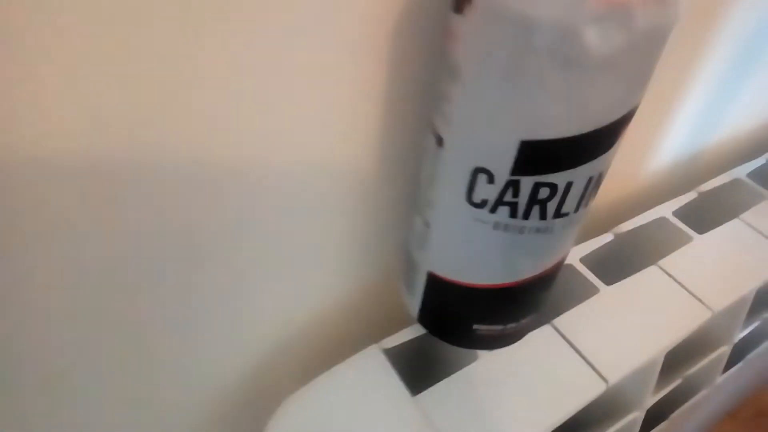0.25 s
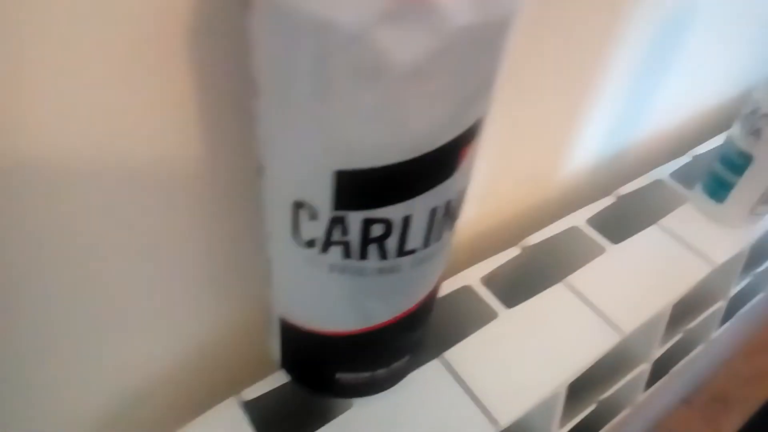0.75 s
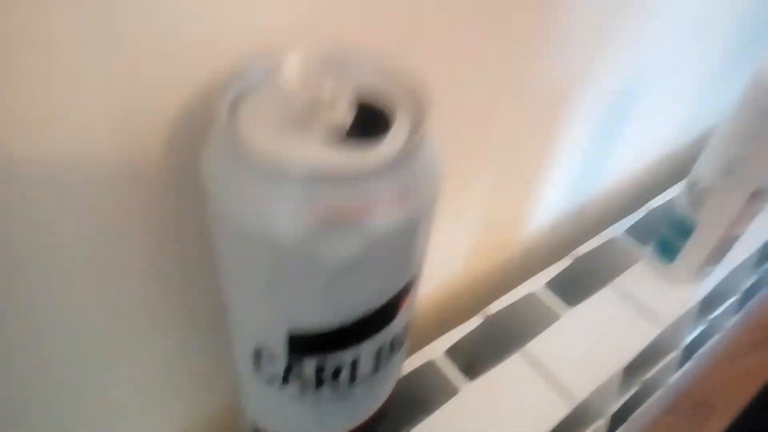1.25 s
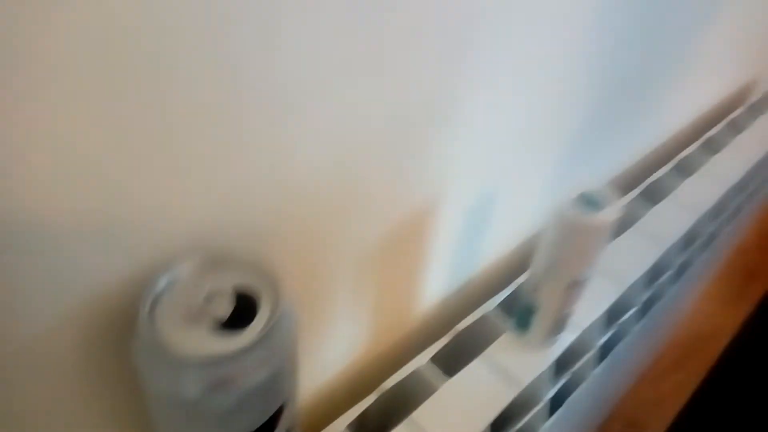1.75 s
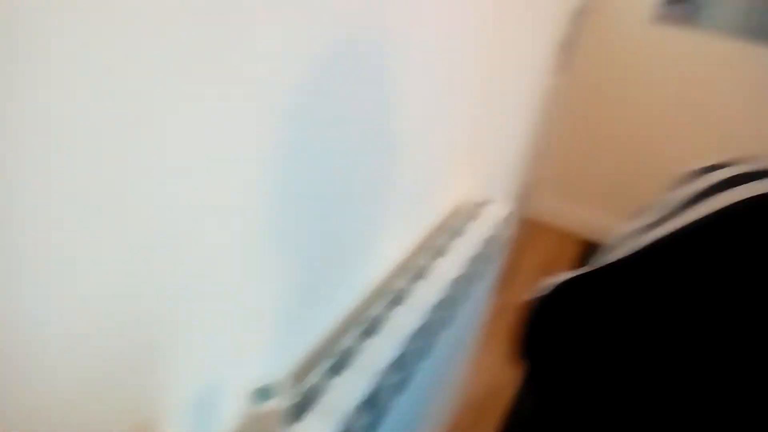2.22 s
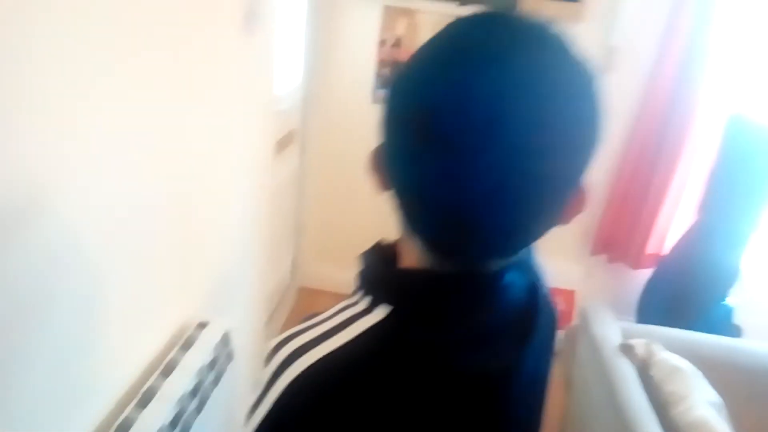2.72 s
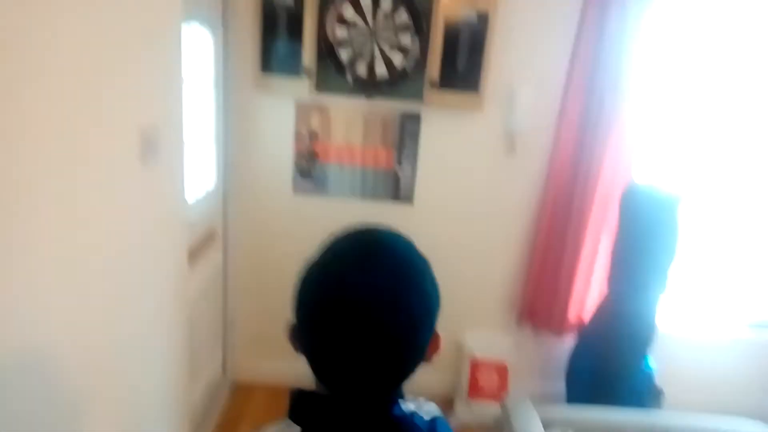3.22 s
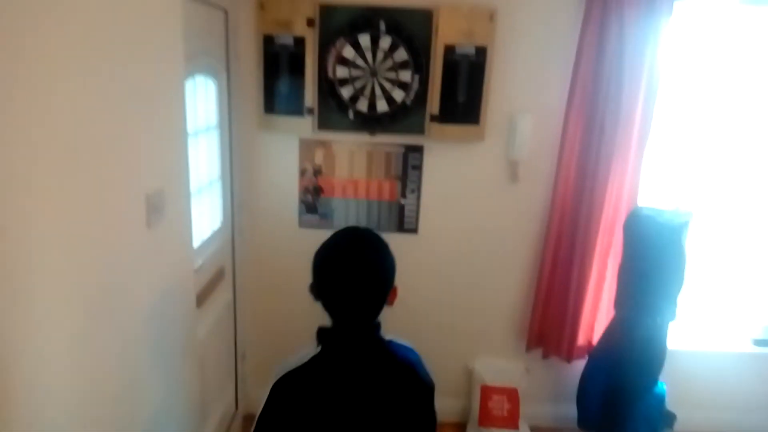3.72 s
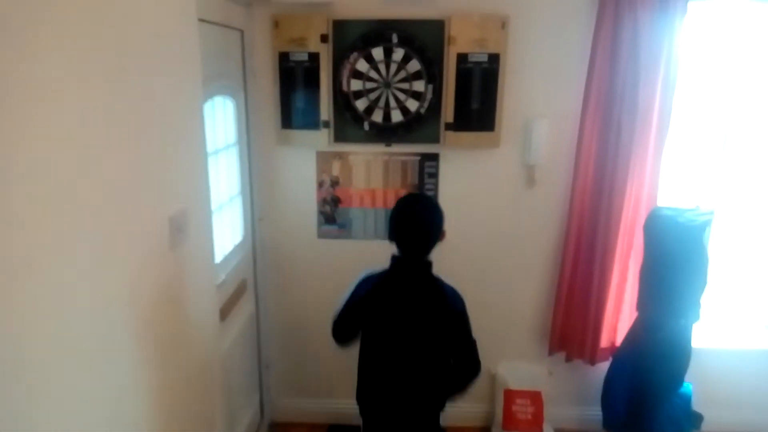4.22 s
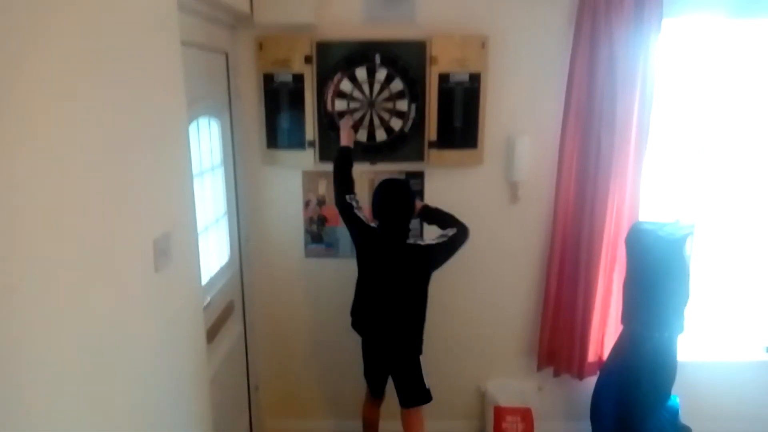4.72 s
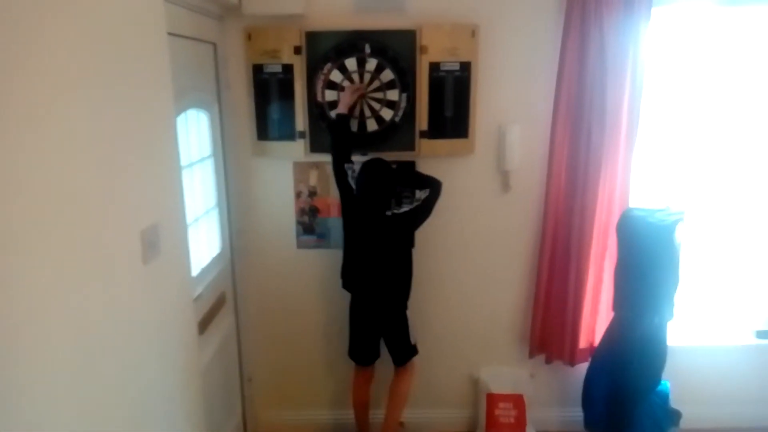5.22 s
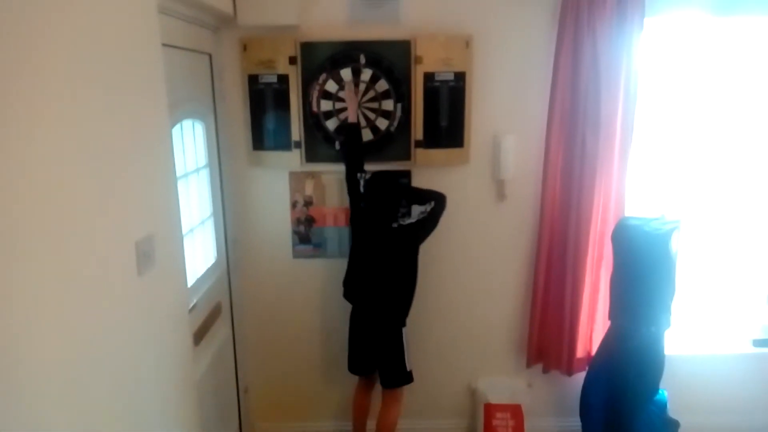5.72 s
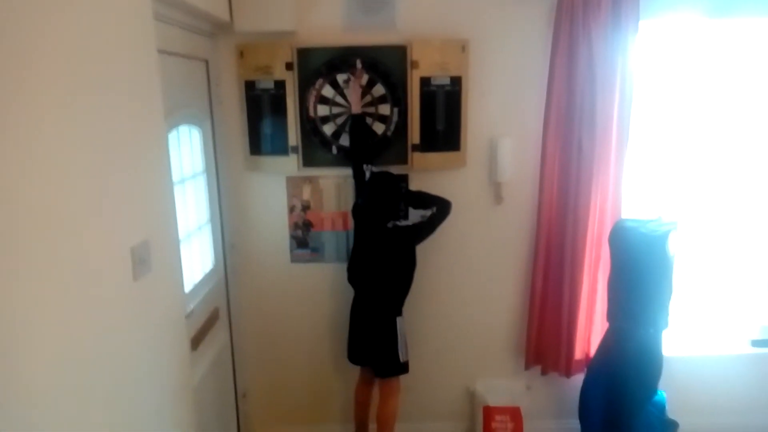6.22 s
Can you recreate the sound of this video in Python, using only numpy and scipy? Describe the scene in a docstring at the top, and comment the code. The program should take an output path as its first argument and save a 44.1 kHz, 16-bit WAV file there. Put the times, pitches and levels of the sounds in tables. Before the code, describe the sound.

A small, bare room is heard with faint microphone hiss, low rumble and a slight rustle of clothes. After a couple of tiny nearby ticks, a dart strikes a dartboard in a wooden wall cabinet across the room at about 0.5 seconds: a loud, short, hollow knock with a brief room echo. A second dart lands at 2.7 seconds, just as loud and a little brighter. The thrower then walks up to the board, much more quietly, with small ticks, a sole scuffing at 3.5 seconds, a lighter scuff around 4 seconds and a dull footfall on the hard floor at 4.6 seconds. At about 5.4 seconds the darts are pulled out, their metal barrels meeting in a quick, bright double clink, followed by one more short clink at 5.9 seconds. A few very faint steps continue until about 6.4 seconds.

```python
"""Two darts thud into a board in a wooden wall cabinet across a small bare room: each impact excites
damped modes of board and cabinet. The thrower walks up, soles scuffing by friction and thumping
on a hard floor, and pulls the darts, whose metal barrels clink in rapid collisions. Small ticks sound
nearby; clothes rustle over a low rumble, a faint hum, two thin whistles and the microphone's hiss."""
import sys
import numpy as np
from scipy import signal
from scipy.fft import rfft, irfft, next_fast_len
from scipy.io import wavfile
from scipy.ndimage import uniform_filter1d, map_coordinates

SR = 44100
rng = np.random.default_rng(int(sys.argv[2]) if len(sys.argv) > 2 else 0)


def inscribe(sig):
    """Save sig as 16-bit PCM at rate SR to the path in sys.argv[1].

    A 1-D sig is mono; a 2-D sig holds one channel per row.
    Samples are clipped to [-1, 1] before scaling.
    """
    pcm = np.round(np.clip(np.atleast_2d(sig).T, -1, 1) * 32767)
    wavfile.write(sys.argv[1], SR, pcm.astype(np.int16))


N = 284709

# dart impacts: start_s, knock_db, upper_db, scratch_lead_s, scratch_db, tick_db, thump_lead_s, thump_db
DART_HITS = [(0.469, -7, -0.5, 0.0029, -47, -30, 0.02, -40.5),
             (2.699, -5.5, 8.5, .006, -22, -42, 0.013, -44)]
# modes of the struck bodies: pitch_hz, level_db, t60_s
BOARD_MODES = [(233.5, -9, 0.037), (249, -12.5, 0.081), (322, -6, 0.053), (368, -1, 0.04), (416, 2.5, .045),
               (473, 2, 0.036), (545.5, -8, 0.066), (692, 1, 0.028), (770, -3.5, 0.016),
               (895, -13.5, 0.024), (1090, -18.5, 0.013), (1400, -21, 0.05), (1487, -16, 0.019),
               (1688, -28, 0.032), (1934, -30.5, .02), (2280, -38, .02)]  # board and cabinet
TIP_MODES = [(3660, -1, 0.011), (4730, -9.5, 0.0078), (6878, -15.5, 0.0089), (12400, -10.5, .002)]
BARREL_MODES = [(1288, -3, 0.018), (1548, -3, 0.029), (1752, 0, 0.022), (1884, -16.5, 0.021),
                (2773, -10, 0.0094), (3413, -0.5, 0.0079), (3680, 0.5, 0.0088), (4460, 6.5, 0.006),
                (5160, -3, 0.0096), (6580, -17, 0.002), (6760, -14, 0.012), (6870, -4.5, 0.01),
                (7084, 1.5, .01), (8540, -5.5, 0.01), (8510, 0, 0.0028), (8790, -1.5, 0.014),
                (9470, -10, 0.009), (11030, -9.5, 0.0032), (12700, -25.5, .004), (13120, -25, .005),
                (14300, -26, .005)]
JOIST_MODES = [(102.2, -3, .1), (133, -2.5, 0.17)]
# a faint low thump just before the knock: pitch_hz, level_db, t60_s
THUMP_MODES = [(30.5, -5.5, 0.16), (75, -8.5, 0.19), (160, -5.5, .05), (330, -10.5, 0.034)]
# barrels striking the board's wire or each other: start_s, peak_db, length_s, low_modes_db, mid_modes_db
BARREL_CLINKS = [(.52, -41, 0.022, 30.5, 18.5), (5.389, -43, 0.01, 6.5, 9.5),
                 (5.406, -17.5, 0.0185, 2.5, 10.5), (5.42, -14.5, .034, -26, -6.5),
                 (5.8985, -17.5, 0.012, -38.5, -8)]
# soles dragging: start_s, peak_db, length_s, tilt_db_per_octave
SOLE_DRAGS = [(.092, -55.5, 0.055, -5), (2.036, -48, 0.0056, -7), (2.258, -61, 0.032, 10),
              (2.512, -47, 0.01, -5), (3.184, -50, 0.022, -3), (3.52, -32, 0.022, 2),
              (3.637, -45.5, 0.021, -8), (4.043, -42, 0.02, -0.5), (4.191, -44.5, 0.0023, -9),
              (5.117, -60, 0.017, -2)]
# feet landing: start_s, peak_db, length_s, tilt_db_per_octave, joist_relative_db
FOOTFALLS = [(0.172, -56.5, 0.013, -8, 0.5), (2.402, -50, 0.05, -10, -2), (3.524, -52.5, 0.06, -4, -21.5),
             (4.045, -58, 0.039, 5.5, -14), (4.152, -56.5, 0.029, -5, -22), (4.584, -32.5, 0.025, 0.64, -5),
             (5.004, -66, 0.0406, -5.5, -5), (5.406, -46, 0.028, 0, -16), (5.791, -47.5, 0.056, 5, -16),
             (6.357, -56.5, 0.011, 1.8, -19)]
# small nearby ticks: start_s, peak_db
TICK_EVENTS = [(0.094, -45.5), (.175, -42.5), (2.007, -54.5), (2.510, -54.5), (3.184, -46), (4.189, -45.5)]
# resonances of a tick: pitch_hz, level_db, t60_s
TICK_MODES = [(1907, -7, 0.011), (2700, 1.5, 0.006), (3400, 1.5, 0.0065), (4300, -2, 0.006),
              (5200, -6, 0.0054), (7900, -8.5, 0.0026)]
# noise spectra: frequency_hz, density_db
POINT_SPECTRUM = [(1290, -27.5), (2200, 3), (2880, -6.5), (3150, -2.5), (4480, 1.5), (6160, -8.5),
                  (7190, -1.5), (9340, -7.5), (10500, -19.5), (11500, -19), (15500, -26)]  # steel point entering the fibres
SOLE_SPECTRUM = [(350, -56.5), (600, -35), (1310, -21.5), (1560, -21), (1670, -22), (3190, -1),
                 (3700, -6.5), (4900, 1), (5690, -9), (9620, -12.5), (15000, -43)]
FLOOR_SPECTRUM = [(60, -42.5), (140, -14.5), (260, -2), (400, -6.5), (700, -5.5), (900, -11), (1300, -12.5),
                  (2400, -29), (3180, -21), (6000, -46.5), (9000, -75), (14000, -120)]  # floor boards under a heel
CLOTH_SPECTRUM = [(470, -50), (800, -14.5), (860, -15.5), (1160, -13), (1310, -14), (1870, -16),
                  (2850, -11.5), (4330, -8), (4940, -7), (5630, -15.5), (14000, -26)]
RUMBLE_SPECTRUM = [(12, -42), (20, -13.5), (65, -10.5), (102, -2), (310, -14), (357, -11.5), (419, -10),
                   (900, -17), (1170, -34), (1980, -120)]
HISS_SPECTRUM = [(12, -37.5), (20, -7.5), (122, -9.5), (252, 2.5), (599, -9), (688, -14), (1460, -7.5),
                 (2410, -13.5), (3190, -3.5), (4580, -21), (5880, -26.5), (9710, -12), (15600, -18.5)]
# rustle of clothes as people move: time_s, level_db
RUSTLE_LEVELS = [(0, -65.5), (.3, -67.5), (0.701, -72.5), (1.5, -70), (2.08, -65), (2.601, -66.5),
                 (3.1, -63.5), (4.05, -64.5), (4.3, -72.5), (4.6, -65.5), (5.3, -70), (6.1, -73.5),
                 (6.46, -72)]
# a hum and two whistles: pitch_hz, width_hz, level_db
TONE_BANDS = [(96.6, 18, -74.5), (5000, 170, -64), (1680, 60, -73.5)]
# when each of them sounds: start_s, end_s
TONE_TIMES = [(-2, 8.5), (3.75, 4.15), (4.95, 5.22)]
# reverberation time of the room: frequency_hz, t60_s
ROOM_DECAY = [(100, 0.63), (260, 0.4), (700, 0.47), (1840, 0.45), (4850, 0.43), (9000, 0.36), (14000, 0.22)]
# early reflections from the walls: delay_s, gain_db
WALL_ECHOES = [(.0048, -7), (.0097, -6), (.013, -6), (.021, -12.5), (.029, -9), (0.0376, -14.5)]
# resonance of the microphone port: pitch_hz, width_hz, gain_db
PORT_RESONANCE = (4850, 220, 2.3)


def dart_impacts():
    """Impact excitation: the point scratches in and ticks; the barrel's weight rings board and cabinet."""
    track = np.zeros(N)
    is_upper = np.array(BOARD_MODES)[:, 0] > 750
    # the cabinet is too small to radiate bass
    bass_cut = signal.butter(8, 200, "highpass", fs=SR, output="sos")
    for start_s, knock_db, upper_db, lead_s, scratch_db, tick_db, thump_lead_s, thump_db in DART_HITS:
        scratch = noise(POINT_SPECTRUM, 2048) * burst(lead_s / 2, 2048)
        radiate(track, start_s - lead_s, scratch_db, scratch, wet_db=2)
        tick = ring(TIP_MODES, cycles=0.64)
        radiate(track, start_s, tick_db, tick, wet_db=-9, echo_db=-8)  # treble beams straight out
        knock = ring(BOARD_MODES, cycles=0.3, extra_db=np.where(is_upper, upper_db, 0))
        radiate(track, start_s, knock_db, signal.sosfilt(bass_cut, knock), wet_db=2)
        thump = ring(THUMP_MODES, cycles=0.14)  # a faint low thump just before the knock
        radiate(track, start_s - thump_lead_s, thump_db, thump, wet_db=-6)
    return track


def barrel_clinks(touches_per_s=450, scatter_db=5, fall_db=9, top_db=3):
    """Repeated collision: each of a run of uneven, fading touches excites the barrel's modes anew."""
    track = np.zeros(N)
    mode_group = np.digitize(np.array(BARREL_MODES)[:, 0], [2500, 6000, 10000])
    for start_s, peak_db, length_s, low_db, mid_db in BARREL_CLINKS:
        balance_db = np.choose(mode_group, [low_db, mid_db, 0, top_db])
        gaps, strengths = rng.random((2, 30))
        delays = np.cumsum(2 * gaps) / touches_per_s
        delays -= delays[0]
        chatter = np.zeros(SR // 2)
        for delay_s, strength in zip(delays[delays < length_s], strengths):
            touch_db = scatter_db * (2 * strength - 1) - fall_db * delay_s / length_s
            touch = ring(BARREL_MODES, cycles=2.54, extra_db=balance_db)
            chatter[round(delay_s * SR):][:len(touch)] += amp(touch_db) * touch
        radiate(track, start_s, peak_db, chatter, wet_db=1.5)
    return track


def sole_scuffs():
    """Sliding friction: a dragging sole makes a burst of gritty noise."""
    track, size = np.zeros(N), SR // 3
    for start_s, peak_db, length_s, tilt_db in SOLE_DRAGS:
        grit = amp(0.79 * unit(uniform_filter1d(rng.standard_normal(size), size=90)))
        bite = burst(length_s / 2, size) ** 1.5  # the sole bites gradually
        radiate(track, start_s, peak_db, grit * noise(SOLE_SPECTRUM, size, tilt_db) * bite, wet_db=2)
    return track


def footfalls():
    """Forced and free vibration: a heel pushes into the floor boards, and the joist below rings on."""
    track, size = np.zeros(N), SR // 3
    for start_s, peak_db, length_s, tilt_db, joist_db in FOOTFALLS:
        thump = noise(FLOOR_SPECTRUM, size, tilt_db) * burst(length_s / 2, size)
        radiate(track, start_s, peak_db, thump, wet_db=-3.5)
        radiate(track, start_s, peak_db + joist_db, ring(JOIST_MODES, cycles=0.35), wet_db=-4)
    return track


def near_ticks():
    """Direct field: these briefly ringing ticks are close to the microphone, so the room adds less."""
    track = np.zeros(N)
    for start_s, peak_db in TICK_EVENTS:
        radiate(track, start_s, peak_db, ring(TICK_MODES, cycles=0.34), wet_db=-3.5, echo_db=-5)
    return track


def rustle_and_rumble():
    """Amplitude modulation: the noise of clothes and the house's rumble both grow when people move."""
    rustle_db = np.interp(np.arange(N) / SR, *np.transpose(RUSTLE_LEVELS))
    rumble_db = -71.5 + 0.3 * (rustle_db - rustle_db.mean())
    rustle = amp(rustle_db + 1.2 * wobble(4.5) + 0.81 * wobble(22)) * noise(CLOTH_SPECTRUM, N)
    rumble = amp(rumble_db + 1.5 * wobble(24)) * noise(RUMBLE_SPECTRUM, N)
    return rustle + rumble


def hum_and_whistles():
    """Narrow-band noise: random modulation spreads each sine into a band, which swells and fades."""
    track, t = np.zeros(N), np.arange(N) / SR
    for (start_s, end_s), (pitch_hz, width_hz, level_db) in zip(TONE_TIMES, TONE_BANDS):
        progress = np.clip((t - start_s) / (end_s - start_s), 0, 1)
        swell = np.sin(np.pi * progress) ** 0.5
        track += amp(level_db) * swell * wobble(width_hz) * np.sin(2 * np.pi * pitch_hz * t)
    return track


def radiate(track, start_s, peak_db, sound, wet_db, echo_db=0):
    """Convolution: adds a sound to the track with its wall echoes and a diffuse tail new for each call."""
    size = 3 * SR // 4
    hz, t, spectra = signal.stft(rng.standard_normal(size), SR, nperseg=256)
    decay = amp(-60 * t / along(ROOM_DECAY, hz)[:, None])
    tail = signal.istft(spectra * decay, SR, nperseg=256)[1][:size]
    tail *= 1 - np.exp(-np.arange(size) / SR / 0.014)  # echoes take a moment to become dense
    response = amp(wet_db) * tail / np.linalg.norm(tail)
    response[0] += 1  # direct path
    for delay_s, gain_db in WALL_ECHOES:
        response[round(delay_s * SR)] += amp(gain_db + echo_db)
    heard = signal.fftconvolve(amp(peak_db) * sound / np.abs(sound).max(), response)
    start = round(start_s * SR)
    track[start:start + len(heard)] += heard[:len(track) - start]


def ring(modes, cycles, extra_db=0):
    """Modal superposition: damped sines of slightly random strength, each swelling over some cycles."""
    t = np.arange(SR // 5) / SR
    pitch_hz, level_db, t60_s = np.transpose(modes)[:, :, None]
    level_db = level_db + np.reshape(extra_db, (-1, 1)) + rng.standard_normal(pitch_hz.shape)
    swell = (1 - np.exp(-t * pitch_hz / cycles)) ** 2
    return np.sum(swell * amp(level_db - 60 * t / t60_s) * np.sin(2 * np.pi * pitch_hz * t), axis=0)


def noise(spectrum, size, tilt_db=0):
    """Spectral shaping: coloured noise of rms 1, tilted by tilt_db per octave."""
    fft_size = next_fast_len(size)
    hz = np.fft.rfftfreq(fft_size, 1 / SR)
    gain = amp(along(spectrum, hz) + tilt_db * np.log2(hz + 1)) * (hz > spectrum[0][0])
    return unit(irfft(rfft(rng.standard_normal(fft_size)) * gain, fft_size)[:size])


def burst(rise_s, size):
    """Critically damped envelope: it peaks after rise_s, at least 1 ms, and dies away."""
    u = np.arange(size) / SR / max(rise_s, 0.001)
    return u * np.exp(1 - u)


def wobble(rate_hz):
    """Spline interpolation: a smooth curve through rate_hz random knots a second."""
    knots = rng.standard_normal(int(N * rate_hz / SR) + 4)
    return map_coordinates(knots, [np.arange(N) * rate_hz / SR])


def along(points, hz):
    """Interpolation on a logarithmic frequency axis."""
    knots_hz, values = np.transpose(points)
    return np.interp(np.log(hz + 1), np.log(knots_hz + 1), values)


def amp(db):
    """Amplitude ratio of a level in dB."""
    return 10 ** (np.asarray(db) / 20)


def unit(x):
    """Normalisation to rms 1."""
    return x / np.sqrt(np.mean(x ** 2) + 1e-20)


def scene():
    """Superposition: the pressures of all sources add at the microphone."""
    events = dart_impacts() + barrel_clinks() + sole_scuffs() + footfalls() + near_ticks()
    return (events + hum_and_whistles() + rustle_and_rumble())[None]


def record(dry, hiss_db=-71, top_hz=15650):
    """Resonance and self-noise: the port lifts a narrow band, hiss is added, and the top is cut off."""
    fft_size = next_fast_len(N + SR // 2)
    hz = np.fft.rfftfreq(fft_size, 1 / SR)
    pitch_hz, width_hz, gain_db = PORT_RESONANCE
    damping = 1j * hz * width_hz
    port = 1 + (amp(gain_db) - 1) * damping / (pitch_hz ** 2 - hz ** 2 + damping)
    hiss = amp(hiss_db) * noise(HISS_SPECTRUM, N)
    heard = rfft(dry, fft_size) * port + rfft(hiss, fft_size)
    return irfft(heard * (hz < top_hz), fft_size)[:, :N]


dry = scene()
out = record(dry)
inscribe(out)
```